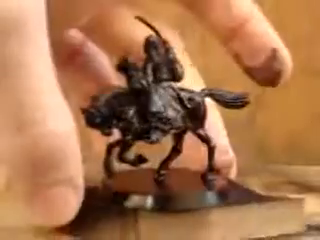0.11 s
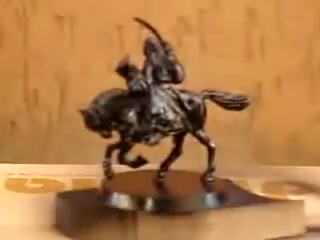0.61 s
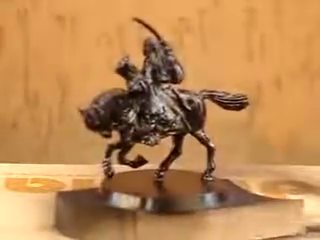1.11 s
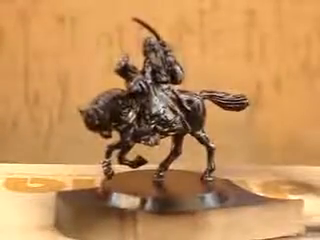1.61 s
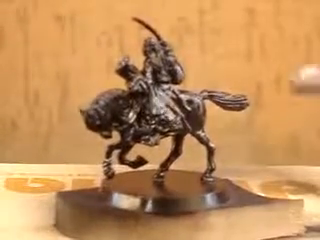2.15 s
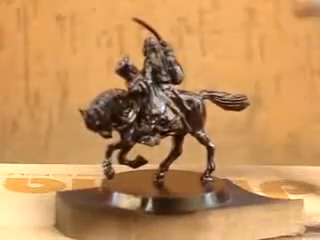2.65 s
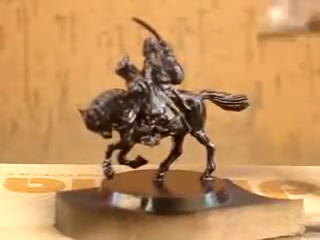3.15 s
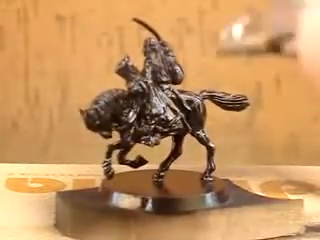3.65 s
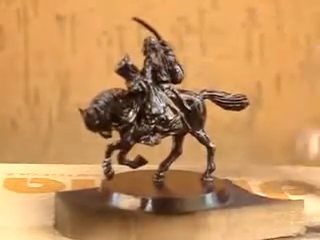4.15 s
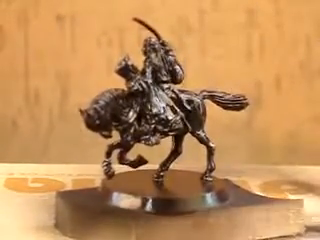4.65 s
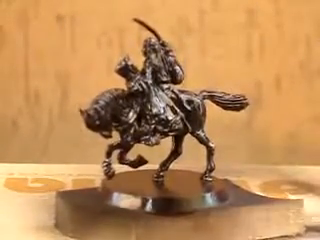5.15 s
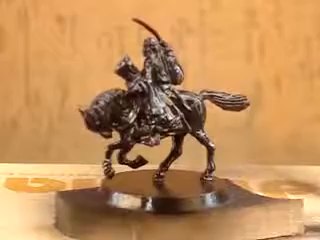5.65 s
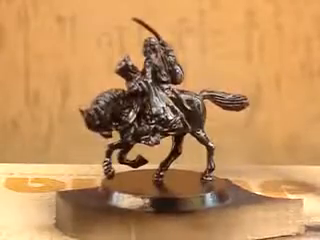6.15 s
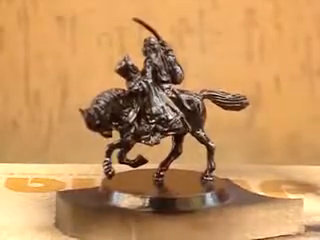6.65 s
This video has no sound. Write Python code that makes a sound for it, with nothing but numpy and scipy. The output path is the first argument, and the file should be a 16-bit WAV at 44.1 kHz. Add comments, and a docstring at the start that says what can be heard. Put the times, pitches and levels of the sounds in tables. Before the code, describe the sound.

A small airbrush works on a metal figure in an indoor workspace. First comes a loud fuzzy fan noise, raised by automatic gain, with faint whine and wood taps. A sharp click pair makes the background duck, and a loud puff of whistling air settles into continuous fine hiss over soft low rumble. Droplets ring briefly, thickest between three and five seconds; the same close mono sound reaches both sides.

```python
"""Airbrush on a small figure

A fan drones, with faint whine and small knocks, lifted by automatic gain: shaped noise, sines, decaying rings.
The trigger ticks, the gain falls and a rush of air (swept resonant noise) dies into the steady spray:
jet hiss, wash and rumble as coloured noise, and nozzle rings driven by noise and droplet clicks.
The hiss shifts colour as the nozzle moves; paint spits ring briefly and narrow hiss coughs.
One microphone feeds both channels."""
import sys
import numpy as np
from scipy import signal
from scipy.fft import rfft, irfft
from scipy.io import wavfile
from scipy.ndimage import uniform_filter1d

SR = 44100
rng = np.random.default_rng(int(sys.argv[2]) if len(sys.argv) > 2 else 0)


def gain_from_db(level_db):
    """Turn a decibel level (scalar or array-like) into a linear amplitude factor."""
    decades = np.asarray(level_db, float) / 20
    return 10 ** decades


def pcm_store(signal):
    """Save signal as 16-bit PCM."""
    levels = np.round(np.clip(np.atleast_2d(signal), -1, 1) * 32767)
    wavfile.write(sys.argv[1], SR, levels.astype(np.int16).T)


N = 298557
T_S = np.arange(N) / SR
HZ = np.fft.rfftfreq(1024, 1 / SR)
FRAME_S = np.arange(N // 256 + 5) * 256 / SR

DUCK_DB = 24  # depth of the gain drop
OPEN_S = 1.1372  # the valve opens

# fan level under full gain: (time [s], level [dB])
FAN_LEVEL = [(0.0, -37), (0.048, -36), (0.294, -37), (0.416, -34.5), (1.1, -36)]
# fan drone, relative spectrum: (frequency [Hz], density [dB per Hz])
FAN_SPECTRUM = [(15, -46), (25, -9), (70, -7.5), (168, -9), (257, -4), (458, -7), (519, -5), (684, -7),
                (1690, -7.5), (2060, -8.5), (3000, -17), (3670, -21), (7040, -30), (7590, -30),
                (10000, -35.5), (13000, -112), (22000, -120)]
# fuzzy hum bands and broad humps of the fan drone: (frequency [Hz], width [Hz], boost [dB])
FAN_BANDS = [(79, 14, 6), (128, 16, 4), (264, 25, 8), (394, 30, 7), (513, 26, 9), (775, 40, 4),
             (928, 16, 5), (1308, 35, 5), (2025, 50, 5), (2100, 120, 2), (2400, 60, 4), (4430, 100, 4),
             (7700, 500, 2)]
# thin steady tones under full gain: (frequency [Hz], rms level [dB])
WHINE = [(7390, -77), (7612, -70), (7644, -71), (7865, -70)]
# knocks on wood, then two trigger ticks, under full gain:
# (time [s], main mode level [dB], frequency [Hz], t60 [s])
KNOCKS = [(.04, -35.5, 320, 0.19), (.876, -36, 554, .05), (.926, -32.5, 1350, 0.081),
          (1.015, -36, 257, .12), (1.131, -23, 2450, 0.014), (1.1355, -15.5, 3090, 0.035)]
# wet coughs of the nozzle: (time [s], length [s], level [dB], frequency [Hz])
COUGHS = [(1.771, 0.024, -43, 3050), (1.936, 0.032, -41.5, 3130), (4.707, 0.029, -48, 3240),
          (6.718, .025, -43.5, 3300)]
# loud paint spits: (time [s], main mode level [dB], ring frequency [Hz])
SPITS = [(1.9096, -30, 4120), (2.1386, -34, 3200), (3.2211, -27.5, 4950), (3.2765, -25.5, 4600),
         (3.3159, -29, 4310), (3.4994, -31, 4990), (3.7084, -28, 4370), (4.0373, -31, 4020),
         (4.4053, -32, 4070), (4.6184, -32, 3900), (4.7082, -33, 4160), (4.7764, -34, 4040),
         (4.8499, -32, 4160), (4.9614, -30, 3920), (5.01, -31.5, 3940), (5.1688, -32, 3840),
         (5.2205, -34, 4100), (5.3426, -36, 3900), (5.8001, -26.5, 3530), (5.9684, -33, 3850),
         (6.484, -28, 3700), (6.6367, -16.5, 3790), (6.7184, -31, 3500)]
# spray path: (time [s], jet hiss [dB], wash on the figure [dB], nozzle ring [Hz],
# turn toward the microphone [0-1])
SPRAY = [(1.199, -39, -46.5, 3750, 0.26), (1.65, -41.5, -51, 3900, 0.6), (1.92, -41, -50.5, 3830, 0.4),
         (2.18, -40, -48.5, 4150, 0.9), (2.38, -40, -47.5, 4600, 0.83), (3.01, -39.5, -48, 4180, 1),
         (3.25, -39, -48, 4730, 0.95), (3.7, -39, -48, 4200, 0.8), (3.9, -39.5, -48.5, 3990, 1),
         (4.39, -39.5, -48, 4170, 0.86), (4.6, -40.5, -52, 4140, 0.85), (4.83, -41, -51.5, 3960, 0.95),
         (5.4, -42, -53, 3960, 0.77), (5.6, -41, -52.5, 3700, 1), (6.04, -41.5, -52, 3700, 0.52),
         (6.41, -41.5, -51, 4000, 0.7), (6.6, -38.5, -49.5, 3800, 0.76), (6.77, -38.5, -48.5, 3840, 0.7)]
# relative spectra, nozzle turned away and facing: (frequency [Hz], density [dB per Hz])
JET_AWAY = [(880, -37), (1500, -14), (1660, -12.5), (2200, -38), (2420, -8), (2850, 6.5), (3140, -5),
            (3540, -6), (3920, -3.5), (4780, -1), (5170, -3), (7760, -4), (10000, -8), (13000, -72),
            (22000, -120)]
JET_FACING = [(880, -34), (1500, -10), (1810, -18.5), (2160, 0), (2360, -16.5), (2570, -3.5), (2880, -4.5),
              (3240, -1), (3740, -2), (4380, -2), (6940, -1), (8880, -0.5), (10000, 0.5), (13000, -77),
              (22000, -120)]
# relative spectra of wash and rumble: (frequency [Hz], density [dB per Hz])
WASH = [(350, -33), (600, -15.5), (807, -3), (977, -4.5), (1180, -2), (1420, -4.5), (1720, -1.5),
        (2400, -0.5), (3120, -40), (5280, -120)]
RUMBLE = [(15, -30), (25, 6.5), (70, -7), (113, -8), (303, -3.5), (487, -5.5), (568, -5.5), (700, -3),
          (910, -30), (1540, -120)]
# reflections off block and wall: (frequency [Hz], width [Hz], boost [dB])
BENCH = [(1260, 150, 2.5), (1730, 220, 4.5), (2180, 300, -3), (2480, 120, 4.5), (2850, 250, -3),
         (3190, 170, 3.5), (4830, 150, 2), (5500, 170, 2), (6750, 200, 2), (7650, 250, 2), (8800, 300, 2),
         (9400, 200, 1)]
# brief swells of the rumble: (time [s], boost [dB])
SWELLS = [(2.04, 11), (2.38, 2), (2.84, 3.5), (3.97, 1), (4.21, 1.5), (4.72, 12)]
# nozzle ring relative to the jet hiss: (time [s], level [dB])
RING_LEVEL = [(1.2, -7.5), (1.75, -7.5), (2.1, -9), (3.0, -19), (3.3, -14), (4.0, -9), (4.5, -10.5),
              (4.8, -16), (5.4, -10.5), (5.8, -13), (6.4, -10), (6.77, -17)]


def evened(x):
    """Scales to rms 1."""
    return x / np.sqrt(np.mean(x ** 2) + 1e-20)


def smoothed_twice(x, size):
    """Two passes of a moving average."""
    return uniform_filter1d(uniform_filter1d(x, size=size), size=size)


def drift(size):
    """Slow random curve of rms 1; size in samples."""
    return evened(smoothed_twice(rng.standard_normal(N), size))


def read(points, hz=HZ):
    """Spectrum in dB, interpolated over log frequency."""
    f, db = np.transpose(points)
    return np.interp(np.log(hz + 1), np.log(f + 1), db)


def bumps(peaks, hz=HZ):
    """Resonances as bell curves in dB."""
    return sum(db / (1 + (2 * (hz - mid) / width) ** 2) for mid, width, db in peaks)


def noise(colour_db, patchy_db, flicker_db, ripple_db):
    """Random short-time spectra: brief patches, shared flicker, slow narrow ripples from shifting echoes."""
    a, b, patches, ripples = rng.standard_normal((len(FRAME_S), len(HZ), 4)).T
    # axis 0: bins, axis 1: frames
    patches = evened(uniform_filter1d(uniform_filter1d(patches, size=14, axis=0), size=8, axis=1))
    ripples = evened(uniform_filter1d(uniform_filter1d(ripples, size=5, axis=0), size=110, axis=1))
    flicker = evened(uniform_filter1d(rng.standard_normal(len(FRAME_S)), size=5))
    shape = gain_from_db(colour_db) / np.linalg.norm(gain_from_db(colour_db), axis=0)
    uneven = gain_from_db(patchy_db * patches + flicker_db * flicker + ripple_db * ripples)
    spectra = (a + 1j * b) * shape * uneven
    return evened(signal.istft(spectra, nperseg=1024, noverlap=768)[1][:N])


def resonate(x, hz, width_hz):
    """Moving resonance: shifts the curve hz down to zero, smooths, shifts back."""
    turn = np.exp(2j * np.pi * np.cumsum(hz) / SR)
    r = np.exp(-np.pi * width_hz / SR)
    return 2 * (turn * signal.lfilter([1 - r], [1, -r], x / turn)).real


def rings(rows, upper_db, tick_db, side_db):
    """Decaying modes: main, close lower neighbour, faster-dying upper partner, and a bright noise tick."""
    out, t = np.zeros(N), np.arange(4000) / SR
    ticks = np.diff(rng.standard_normal((len(rows), len(t) + 1)))
    for (start_s, db, hz, t60_s), tick in zip(rows, ticks):
        ring = np.sin(2 * np.pi * hz * t)
        ring += gain_from_db(side_db) * np.sin(2 * np.pi * hz * .9 * t)
        ring += gain_from_db(upper_db - 60 * t / t60_s) * np.sin(2 * np.pi * hz * 1.9 * t)
        ring += gain_from_db(tick_db - 120 * t / t60_s) * tick
        ring *= gain_from_db(db - 60 * t / t60_s) * np.minimum(t / .0005, 1)
        start = round(start_s * SR)
        out[start:][:len(t)] += ring[:N - start]
    return out


def fan():
    """Broad noise drone with fuzzy bands and slight level waver, at its low level before the gain."""
    hz = np.fft.rfftfreq(N, 1 / SR)
    colour = gain_from_db(read(FAN_SPECTRUM, hz) + bumps(FAN_BANDS, hz))
    drone = irfft(rfft(rng.standard_normal(N)) * colour, N)
    level_db = np.interp(T_S, *np.transpose(FAN_LEVEL)) + 0.54 * drift(size=2500)
    return gain_from_db(level_db - DUCK_DB) * evened(drone)


def whine():
    """Faint electronic sines, at their low level before the gain."""
    out = np.zeros(N)
    for hz, rms_db in WHINE:
        out += gain_from_db(rms_db - DUCK_DB) * np.sqrt(2) * np.sin(2 * np.pi * (hz * T_S + rng.random()))
    return out


def knocks():
    """Wood knocks and trigger ticks as decaying modes, at their low level before the gain."""
    return gain_from_db(-DUCK_DB) * rings(KNOCKS, upper_db=-21, tick_db=-14, side_db=-5.5)


def coughs():
    """Nozzle coughs: short bursts of narrow resonant hiss below the nozzle ring."""
    out, width_hz = np.zeros(N), 440
    air = rng.standard_normal(N)
    for start_s, length_s, db, hz in COUGHS:
        steady_hz = np.full(N, hz)
        hiss = evened(resonate(resonate(air, steady_hz, width_hz), steady_hz, width_hz))
        arch = np.sin(np.pi * np.clip((T_S - start_s) / length_s, 0, 1)).clip(0)
        out += gain_from_db(db) * np.sqrt(arch) * hiss
    return out


def spits():
    """Blobs of paint leave the nozzle as short rings: listed loud ones, faint ones at random."""
    faint_per_s, faint_db, spread_db, t60_s = 6, -38, 1.8, .021
    s, _, _, ring_hz, _ = np.transpose(SPRAY)
    span_s = s[-1] - s[0]
    when, size, tune = rng.random((round(faint_per_s * span_s), 3)).T
    at_s = s[0] + when * span_s
    db = faint_db - spread_db * np.log(size + .05)
    hz = np.interp(at_s, s, ring_hz) * (.95 + .1 * tune)
    rows = [(*row, t60_s) for row in [*SPITS, *zip(at_s, db, hz)]]
    return rings(rows, upper_db=-7, tick_db=-9, side_db=-10)


def rush():
    """Valve opening: loud resonant air pops, holds while sagging in level and pitch, then releases."""
    start_db, pop_db, pop_s, sag_db_per_s = -29, 3, .002, 78
    hold_s, release_s, tail_db, tail_s = 0.034, 0.0039, -10, 0.039
    start_hz, pop_hz, sag_hz_per_s, tail_hz = 3080, 150, 8000, 3050
    t = np.maximum(T_S - OPEN_S, 0)
    pop = np.exp(-t / pop_s)
    held = np.minimum(t, hold_s)
    after = np.maximum(t - hold_s, 0)
    released = 1 - np.exp(-after / release_s)
    level_db = start_db + pop_db * pop - sag_db_per_s * held + tail_db * released
    held_hz = start_hz + pop_hz * pop - sag_hz_per_s * held
    hz = (1 - released) * held_hz + released * tail_hz
    air = rng.standard_normal(N)
    ring = evened(resonate(resonate(air, hz, 380), hz, 600))
    upper = evened(resonate(air, np.interp(t, [.003, .023], [5700, 6800]), 1100))
    gate = np.clip(t / .002, 0, 1) * np.exp(-(after / tail_s) ** 2)
    return gain_from_db(level_db) * gate * (ring + gain_from_db(-5) * upper)


def spray_rumble(wash_db):
    """Low turbulence: follows the wash with wider swing, plus swells; the deepest part holds its level."""
    mean_db, swing, wash_mean_db, swell_s = -59.5, 1.85, -49.5, 0.046
    steady_below_hz, steady_db = 196, -63.5
    level_db = mean_db + swing * (wash_db - wash_mean_db)
    level_db += sum(db * np.exp(-((T_S - at_s) / swell_s) ** 2) for at_s, db in SWELLS)
    rumble = noise(read(RUMBLE)[:, None], patchy_db=1.3, flicker_db=0.3, ripple_db=0.2)
    lowpass = signal.butter(2, steady_below_hz, fs=SR, output="sos")
    deep = signal.sosfiltfilt(lowpass, rumble)
    return gain_from_db(level_db) * (rumble - deep) + gain_from_db(steady_db) * evened(deep)


def nozzle_rings(ring_hz):
    """Nozzle cap: two wandering resonances driven by air noise and clumps of droplet clicks."""
    ring_hz = ring_hz + 90 * drift(size=1500)
    upper_hz = 7700 + 250 * drift(size=5000)
    upper_db = -11 + 2.2 * drift(size=5000)
    ring_db = np.interp(T_S, *np.transpose(RING_LEVEL))
    clumps = gain_from_db(3.0 * drift(size=350))
    sizes = gain_from_db(np.minimum(rng.exponential(1, N), 4))
    droplets = sizes * (rng.random(N) < 400 / SR)  # 400 per s on average
    drive = clumps * (rng.standard_normal(N) * 0.12 + droplets * rng.choice([-1, 1], N))
    ring = evened(resonate(resonate(drive, ring_hz, 430), ring_hz, 900))
    upper = evened(resonate(drive, upper_hz, 600))
    return gain_from_db(ring_db) * ring + gain_from_db(upper_db) * upper


def spray():
    """Jet turbulence coloured by nozzle angle, wash where it lands, rumble, and the ringing cap."""
    s, *columns = np.transpose(SPRAY)
    jet_db, wash_db, ring_hz, _ = (np.interp(T_S, s, c) for c in columns)
    facing = np.interp(FRAME_S, s, columns[-1])
    bench_db = bumps(BENCH)[:, None]
    jet_colour_db = np.outer(read(JET_AWAY), 1 - facing) + np.outer(read(JET_FACING), facing) + bench_db
    # dip at 2030 Hz, 1.7 dB deeper per dB of wash below -50.5 dB
    weak_db = np.minimum(np.interp(FRAME_S, s, columns[1]) + 50.5, 0)
    dip_db = np.outer(bumps([(2030, 350, 1.7)]), weak_db)
    jet = noise(jet_colour_db + dip_db, patchy_db=1.33, flicker_db=0.91, ripple_db=1.1)
    wash_colour_db = read(WASH)[:, None] + bench_db + dip_db
    wash = noise(wash_colour_db, patchy_db=1.0, flicker_db=0.1, ripple_db=1.2)
    opened = np.clip((T_S - OPEN_S) / .002, 0, 1)
    hiss = gain_from_db(jet_db) * (jet + nozzle_rings(ring_hz))
    return opened * (hiss + gain_from_db(wash_db) * wash + spray_rumble(wash_db))


def scene():
    """One microphone feeds both channels."""
    mono = fan() + whine() + knocks() + coughs() + spits() + rush() + spray()
    return np.array([mono, mono])


def roll_off(x):
    """The treble ends steeply here."""
    return signal.sosfilt(signal.butter(12, 11090, fs=SR, output="sos"), x)


def record(dry):
    """Gain lifts quiet sound, drops fast on loud treble and kicks the amplifier offset; then a low-pass."""
    quiet_db, let_go_db_per_s, offset, thump_s, edge_hz = -47, 6, -0.024, 0.028, 10150
    highpass = signal.butter(2, 2500, "high", fs=SR, output="sos")
    treble = signal.sosfilt(highpass, dry[0])
    power_db = 10 * np.log10(signal.lfilter(np.ones(30) / 30, 1, treble ** 2) + 1e-12)
    fall_db = let_go_db_per_s * T_S
    held_db = np.maximum.accumulate(power_db + fall_db) - fall_db
    loud = held_db > quiet_db
    ducked = signal.lfilter(np.hanning(100) / 49.5, 1, loud)  # moves in about 2 ms
    lift = gain_from_db(-DUCK_DB * ducked)
    thump = signal.lfilter([1, -1], [1, -np.exp(-1 / (thump_s * SR))], offset * (lift - 1))
    mix = dry * lift * gain_from_db(DUCK_DB) + thump
    lowpass = signal.firwin(511, edge_hz, window=("kaiser", 9), fs=SR)
    mix = signal.oaconvolve(mix, lowpass[None], "same")
    return roll_off(mix)


dry = scene()
out = record(dry)
pcm_store(out)
```